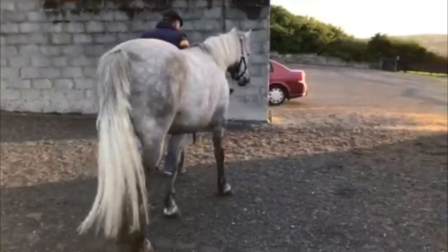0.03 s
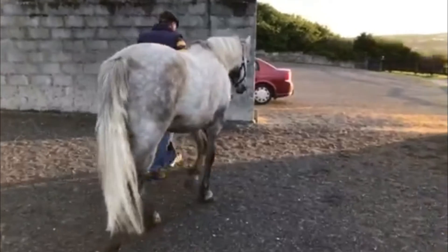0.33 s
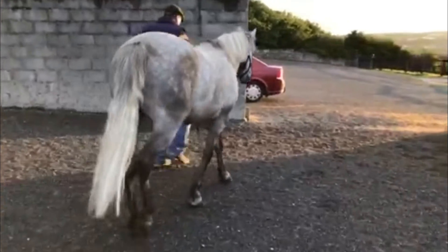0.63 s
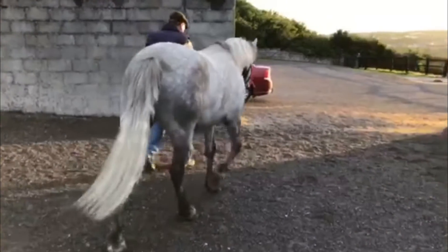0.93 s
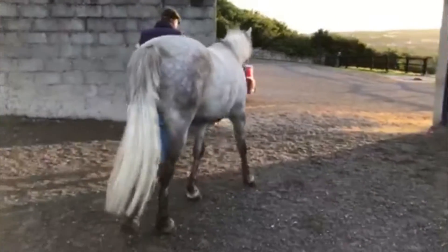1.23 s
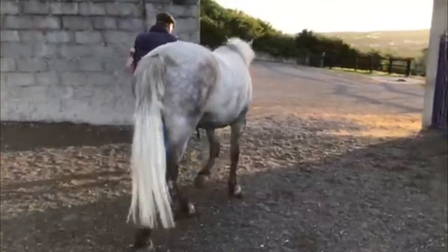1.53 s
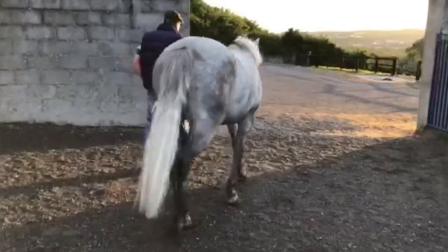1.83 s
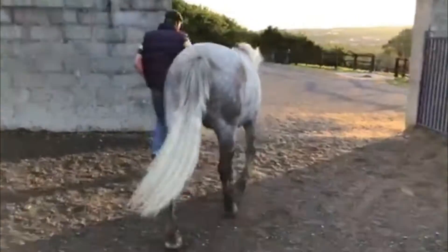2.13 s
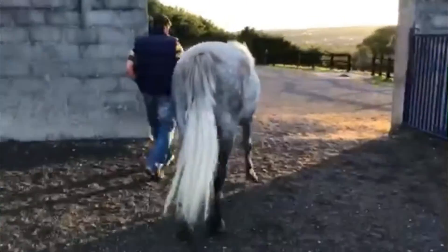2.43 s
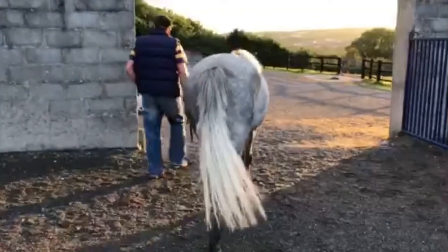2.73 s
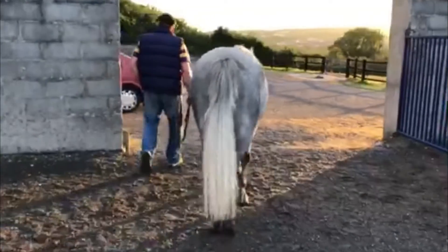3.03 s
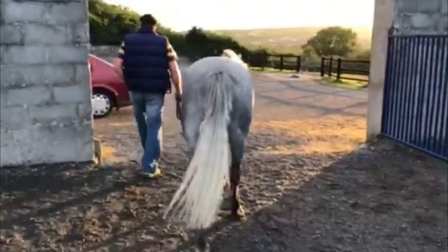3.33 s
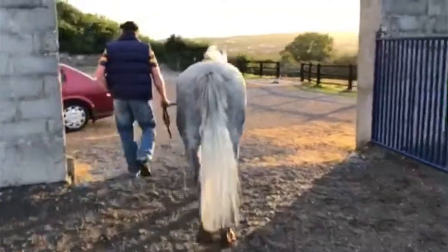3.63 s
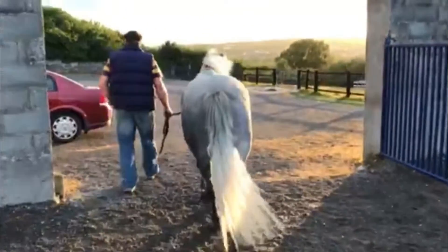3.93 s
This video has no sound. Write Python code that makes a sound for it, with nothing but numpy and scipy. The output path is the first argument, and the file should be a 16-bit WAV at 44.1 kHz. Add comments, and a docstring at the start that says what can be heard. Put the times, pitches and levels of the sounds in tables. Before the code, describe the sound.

A pony and its handler walk across a gravel yard, a few metres from the microphone. Hooves and shoes crunch the grit, with hollow knocks, clacking stones and one brief hoof drag early on. Light wind bumps the microphone.

```python
"""A pony is led at a walk across a gravel yard, a few metres from the microphone.
Hooves and shoes crunch the grit; where a hoof meets a larger stone there is a crack with a short
hollow ring. Kicked stones clack, a hoof drags once, and grit rustles between the steps.
Light wind bumps the microphone over a quiet outdoor hiss."""
import sys
import numpy as np
from scipy import signal
from scipy.fft import rfft, irfft
from scipy.io import wavfile

SR = 44100
rng = np.random.default_rng(int(sys.argv[2]) if len(sys.argv) > 2 else 0)


def int16_out(signal):
    """Quantize to a 16-bit WAV file."""
    q = np.round(np.clip(np.atleast_2d(signal).T, -1, 1) * 32767)
    wavfile.write(sys.argv[1], SR, q.astype(np.int16))


N = 176400


def amp(db):
    """Turns decibels into a volume multiplier."""
    return 10 ** (np.asarray(db) / 20)


def unit(x):
    """Scales a sound to an average (rms) strength of 1."""
    return x / np.sqrt(np.mean(x ** 2) + 1e-20)


def add(mix, start, sound):
    """Mixes a sound in at a start time in seconds."""
    part = mix[max(round(start * SR), 0):][:len(sound)]
    part += sound[:len(part)]


def colour(x, tone):
    """Makes each frequency louder or softer, following a tone table."""
    hz, db = np.transpose(tone)
    grid_hz = abs(np.fft.fftfreq(4096, 1 / SR))
    log_gain = np.log(amp(np.interp(np.log(grid_hz + 1), np.log(hz), db)))
    response = np.exp(np.conj(signal.hilbert(log_gain)))  # rings after a click, never before it
    return signal.fftconvolve(x, np.fft.ifft(response).real[:2048])[:len(x)]


def band(x, hz, kind):
    """Keeps the lows, the highs or a band in between."""
    return signal.sosfilt(signal.butter(2, hz, kind, fs=SR, output="sos"), x)


def split(x, borders_hz=(1276, 5280)):
    """Splits a sound into lows, mids and highs that add up to the whole."""
    hz, spectrum = np.fft.rfftfreq(len(x), 1 / SR), rfft(x)
    lows, lows_and_mids = [1 / (1 + (hz / edge) ** 8) for edge in borders_hz]
    return [irfft(spectrum * gain, len(x)) for gain in (lows, lows_and_mids - lows, 1 - lows_and_mids)]


# Tone of the outdoor air: f/Hz, relative level/dB
AIR_TONE = [(60, 4), (650, -6), (4000, -19.5), (16000, -28.5)]

def air(level_db=-53.5):
    """Steady outdoor rumble and hiss."""
    return unit(colour(rng.standard_normal(N), AIR_TONE)) * amp(level_db)


# Rumble of the breeze: t/s, level/dB
BREEZE_LEVELS = [(0, -49), (.9, -62), (2.9, -50), (3.3, -41), (4, -50.5)]
# Wind bumps on the microphone: t/s, half length/s, level/dB
WIND_BUMPS = [(1.452, .018, -38), (2.06, .04, -39), (2.17, .015, -32), (2.87, .006, -28.5),
              (3.403, .014, -31.5), (3.849, .02, -36)]

def wind(low_hz=35, high_hz=68):
    """A breeze rumbles; swirls of air push the microphone in short, uneven low wobbles."""
    t = np.arange(N) / SR
    wander = unit(band(rng.standard_normal(N), high_hz, "low"))
    rumble = unit(band(rng.standard_normal(N), [low_hz, high_hz], "band"))
    out = rumble * amp(np.interp(t, *np.transpose(BREEZE_LEVELS)))
    for middle, half, db in WIND_BUMPS:
        hz = 14 / np.cbrt(half)  # longer swirls are deeper
        cycles = np.cumsum(hz * (1 + .5 * wander)) / SR + rng.random()
        swell = np.exp(-np.minimum(abs(t - middle) / half, 10) ** 2 / 2)
        out += amp(db) * swell * np.sin(2 * np.pi * cycles)
    return out


def stones(per_s, spread_db, count=48, size=512, ring_cycles=3.55):
    """Random hits of uneven strength, each on one of many small stones with its own brief ring."""
    hits = rng.random(N) < per_s / SR
    hits = hits * amp(spread_db * np.minimum(rng.exponential(1, N), 3.6)) * rng.choice([-1, 1], N)
    which, t = rng.integers(0, count, N), np.arange(size) / SR
    pitches_hz = np.geomspace(600, 13000, count)
    cycles = pitches_hz[:, None] * t
    rings = np.sin(2 * np.pi * cycles) * np.exp(-cycles / ring_cycles)
    ticks = 1.3 * rng.standard_normal(cycles.shape) * np.exp(-2 * cycles)
    spectra = rfft(np.pad(rings + ticks, ((0, 0), (size, size))))
    voices = irfft(spectra / np.sqrt(np.mean(abs(spectra) ** 2, axis=0)))  # evens out the heap's tone
    heap = sum(signal.oaconvolve(hits * (which == k), voices[k]) for k in range(count))
    return unit(heap[size:size + N])


def jerks(per_s=90, fade_s=.008, depth=.7):
    """A volume curve for gravel giving way: each little slip starts at once and dies away."""
    slips = (rng.random(N) < per_s / SR) * rng.uniform(1, 2.8, N)
    energy = signal.lfilter([1], [1, -np.exp(-2 / (fade_s * SR))], slips ** 2)
    return 1 + depth * np.sqrt(energy)


def snap(t, crack_s=.0006, splinter_s=.004):
    """A sharp crack trailing splinters of noise."""
    fade = .45 * np.exp(-t / crack_s) + .08 * np.exp(-t / splinter_s)
    return (t == 0) + rng.standard_normal(len(t)) * fade


# Tone of loose grit: f/Hz, relative level/dB
GRIT_TONE = [(200, -6), (420, -5.5), (650, 3), (1500, -1), (3800, -3.5), (4900, -7.5), (6800, -8.5),
             (10300, -12), (16000, -13)]

def grit(hits):
    """Gives hits and noise the tone of loose grit."""
    return colour(hits, GRIT_TONE)


def hoof_scrape(span_s=(.71, .9), sweep_hz=(540, 1250), width_hz=480, grains_per_s=600, level_db=-44.5):
    """A dragged hoof skips over grit in rough scuffs, with a blurry ring that rises in pitch."""
    t = np.arange(N) / SR
    scuffs = grit(rng.standard_normal(N) * (rng.random(N) < grains_per_s / SR)) * jerks()
    sweep = np.exp(2j * np.pi * np.cumsum(np.interp(t, span_s, sweep_hz)) / SR)
    decay = np.exp(-np.pi * width_hz / SR)
    ring = (sweep * signal.lfilter([1], [1, -decay], scuffs / sweep)).real  # rings at the moving pitch
    swell = np.sqrt(abs(np.sin(np.interp(t, span_s, [0, np.pi]))))
    return amp(level_db) * unit(ring) * swell


HIT_S = .005  # a clack or knock has the energy of a sound held this long at its listed level
# Stone hitting stone: t/s, level/dB, f/Hz
STONE_CLACKS = [(.138, -35.5, 4440), (.1969, -25.5, 3750), (.4832, -39.5, 3400), (.8385, -38.5, 2510),
                (1.1035, -38, 2160), (1.367, -36.5, 1700), (1.4475, -40.5, 3300), (2.079, -51, 2000),
                (2.655, -36, 3160), (2.717, -37, 2200), (3.2892, -35, 1890)]

def kicked_stones(size=2048):
    """A kicked stone hits another and clacks at its own pitch."""
    out, t = np.zeros(N), np.arange(size) / SR
    for start, db, hz in STONE_CLACKS:
        clack = signal.lfilter(*signal.iirpeak(hz, Q=2.5, fs=SR), snap(t))
        add(out, start, amp(db) * unit(clack))
    return out * np.sqrt(HIT_S * SR / size)


# Gravel giving way underfoot: peak t/s, fade/s, level of mids/dB, lows over mids/dB, highs over mids/dB
STEP_CRUNCHES = [(.094, .015, -42, 1.5, 1.5), (0.146, 0.023, -38.5, -1.5, -5),
                 (0.209, 0.035, -43.5, -2.5, -8), (0.373, 0.022, -40.5, -6, 4),
                 (0.489, 0.041, -46.5, -0.5, -1), (.613, 0.02, -43, 3, 0.5), (0.714, 0.016, -44, 3, 4.5),
                 (0.991, 0.021, -34.5, -3, -2), (1.063, 0.017, -42.5, -14, -6), (1.344, 0.039, -45, 2.5, 3),
                 (1.469, 0.071, -46, 0.5, -9), (1.65, 0.019, -34, -10.5, -1.5),
                 (1.976, 0.02, -39.5, -5, -1), (2.029, 0.096, -46, 2, -17), (2.272, 0.018, -39.5, 1, 2),
                 (2.325, .012, -39, -27, -15), (2.369, 0.014, -49.5, 7, 1.5), (2.586, 0.017, -39, 4, 3),
                 (2.64, 0.06, -44, 2, -10), (2.844, 0.039, -50, -23, 7.5), (2.892, .05, -40.5, -15, -18),
                 (3.038, 0.043, -45, -2, -4.5), (3.17, 0.028, -40.5, -1, 0), (3.254, 0.032, -40.5, 4, -13),
                 (3.29, 0.013, -36, 3, -23), (3.441, .017, -33, -7.5, -3), (3.496, 0.024, -36, -16, -7.5),
                 (3.579, .025, -40.5, -10, -6.5), (3.743, 0.0085, -40, 1, -2.5),
                 (3.81, 0.035, -51.5, 6.5, 4)]
# Moments when no foot moves: t/s, half length/s
STILL_MOMENTS = [(0.308, 0.043), (1.25, 0.035), (1.605, 0.019), (2.202, 0.038), (2.78, .04), (3.366, 0.039)]

def gravel(rustle_db=(-56, -54, -57.5), pebble_db=-51.5):
    """Each footfall presses out a swell of grains; loose pebbles go on ticking around it."""
    t = np.arange(N) / SR
    power = amp(rustle_db)[:, None] ** 2 * np.ones(N)  # rows: lows, mids, highs
    for peak, fade, db, lows_db, highs_db in STEP_CRUNCHES:
        from_peak = np.maximum((t - peak) / fade, (peak - t) / (fade * .7))  # rises faster than it fades
        swell = np.exp(-np.minimum(from_peak, 10) ** 1.7)
        power += (amp([[db + lows_db], [db], [db + highs_db]]) * swell) ** 2
    stirring = np.minimum(np.sqrt(power[1]), amp(-46))  # pebbles follow the mids, up to a limit
    for middle, half in STILL_MOMENTS:
        power *= 1 - 1 / (1 + ((t - middle) / half) ** 10)
    grains = stones(per_s=6000, spread_db=4)
    sand = .37 * rng.standard_normal(N)
    grinding = grit(grains + sand) * jerks()
    crunch = sum(unit(part) * np.sqrt(row) for part, row in zip(split(grinding), power))
    pebbles = grit(stones(per_s=260, spread_db=4.5)) * stirring
    return crunch + amp(pebble_db) * unit(pebbles)


# Tone of a hoof's crack on stone: f/Hz, relative level/dB
CRACK_TONE = [(300, -25.5), (1000, 7.5), (4000, -2.5), (16000, -11.5)]
# Hoof hitting stone: t/s, level of the crack's mids/dB, ring f/Hz, ring level/dB
HOOF_KNOCKS = [(0.1081, -38, 940, -35), (0.1492, -42, 690, -33), (0.1598, -45, 710, -33.5),
               (0.197, -56, 1000, -30.5), (0.2204, -41.5, 1060, -36.5), (0.447, -38.5, 1000, -38),
               (0.4647, -29, 1204, -29), (1.0944, -33, 1450, -31.5), (1.3045, -57, 557, -39),
               (1.3581, -41, 890, -38.5), (1.4112, -36, 604, -38), (1.4976, -36.5, 1050, -36),
               (2.2209, -41.5, 550, -38.5), (2.2803, -44, 1000, -35.5), (2.5897, -52, 620, -36),
               (2.6091, -46, 700, -30), (2.6406, -36.5, 665, -27.5), (3.1624, -41, 653, -26),
               (3.2208, -27.5, 752, -22.5), (3.2528, -29, 574, -33), (3.2843, -39, 1160, -29.5),
               (3.7978, -40.5, 620, -35.5)]

def hooves(size=2048, lead_in=64, ring_cycles=2.1, echo_s=.0032):
    """A hoof cracks on a stone, hoof or stone rings hollowly, and the sound bounces off the ground."""
    out, t = np.zeros(N), np.arange(size) / SR
    for hit_time, crack_db, hz, ring_db in HOOF_KNOCKS:
        lows, mids, highs = map(unit, split(np.pad(colour(snap(t), CRACK_TONE), (lead_in, 0))))
        crack = amp(-7.5) * lows + mids + amp(-9) * highs
        swell = np.exp(-hz * t / ring_cycles) * (1 - np.exp(-2 * hz * t))
        ring = unit(np.pad(np.sin(2 * np.pi * hz * t) * swell, (lead_in, 0)))
        knock = amp(crack_db) * crack + amp(ring_db) * ring
        knock *= np.sqrt(HIT_S * SR / len(knock))
        start = hit_time - lead_in / SR
        add(out, start, knock)
        add(out, start + echo_s, .18 * knock)
    return out


def scene():
    """Steps, wind and air, mixed into one channel."""
    return (gravel() + hooves() + kicked_stones() + hoof_scrape() + wind() + air())[None]


def record(dry, low_cut_hz=28, high_cut_hz=16200):
    """The microphone loses the deepest bass, and the very highest treble is cut off."""
    treble_cut = signal.firwin(511, high_cut_hz, window=("kaiser", 9), fs=SR)
    return signal.oaconvolve(band(dry, low_cut_hz, "high"), treble_cut[None], "same")


dry = scene()
out = record(dry)
int16_out(out)
```